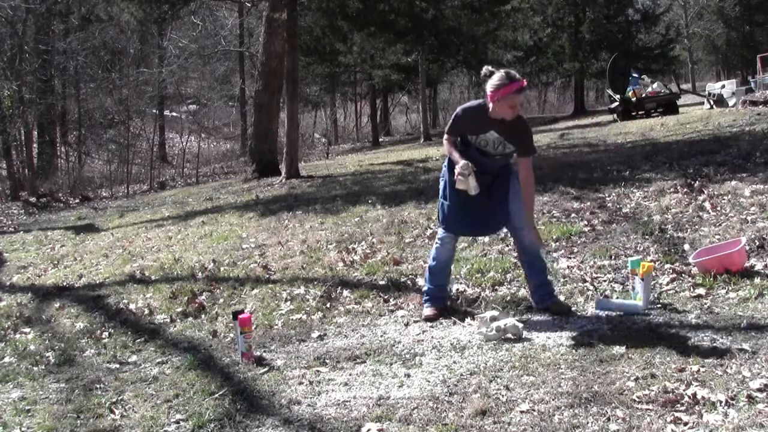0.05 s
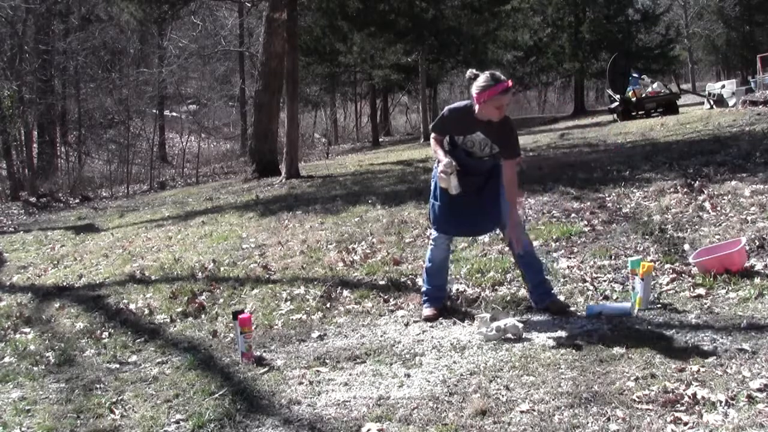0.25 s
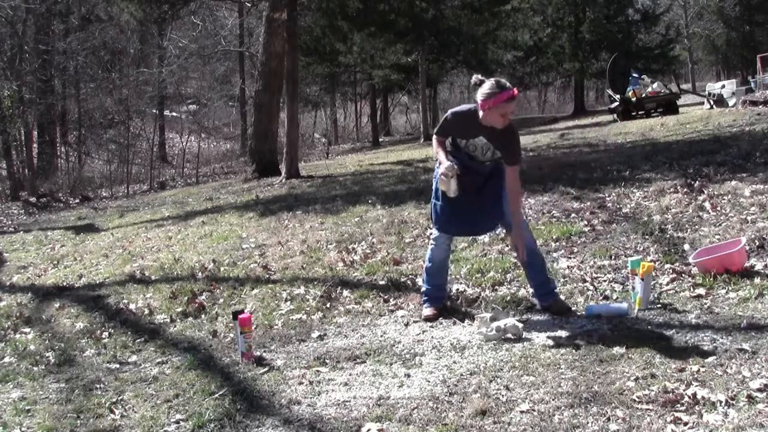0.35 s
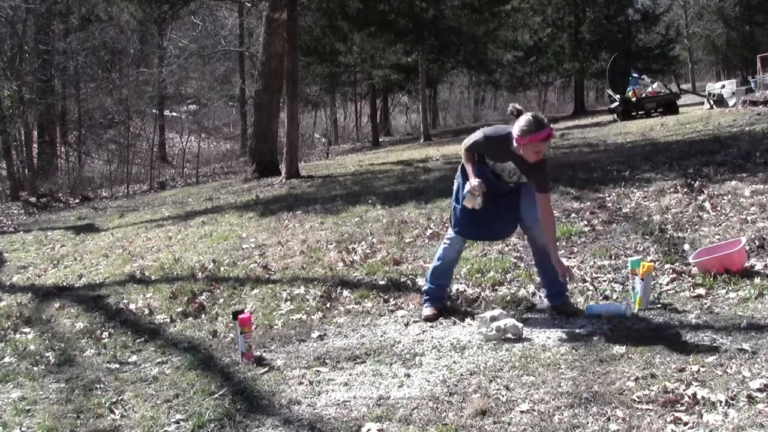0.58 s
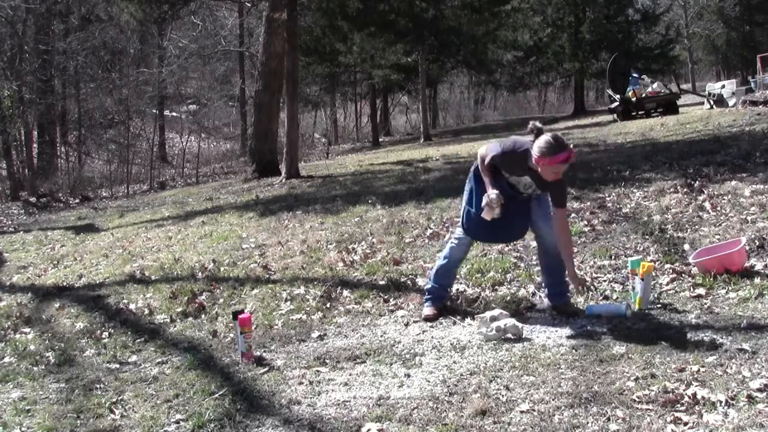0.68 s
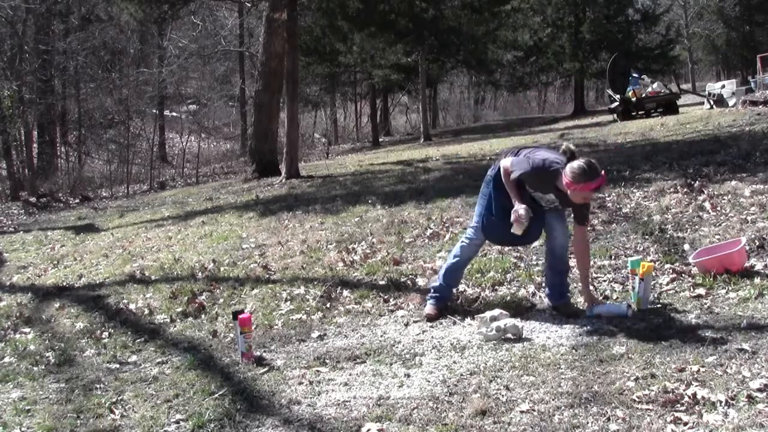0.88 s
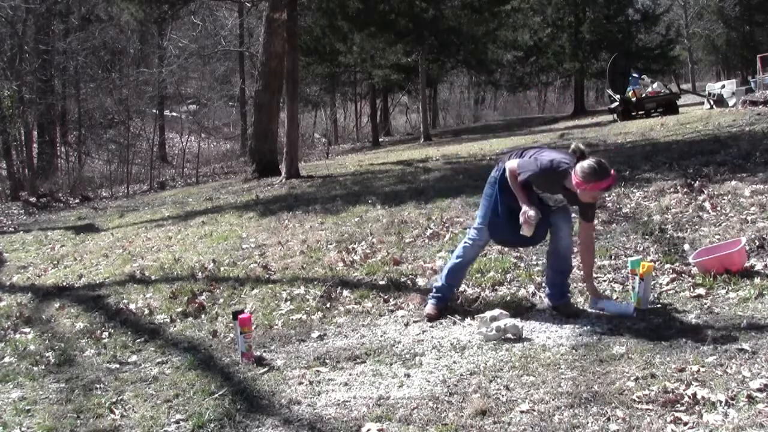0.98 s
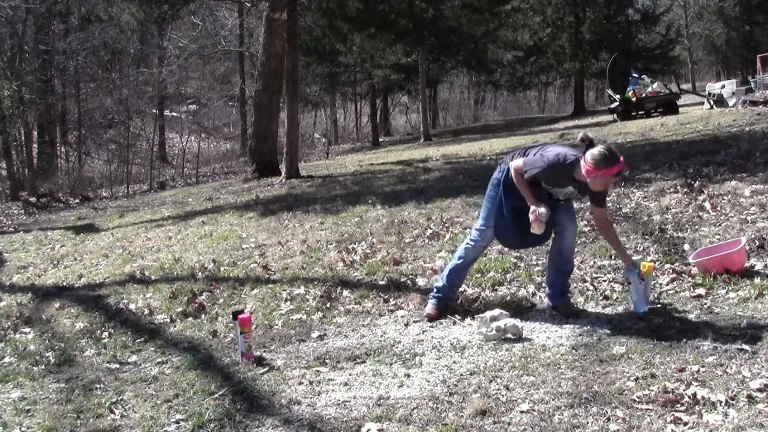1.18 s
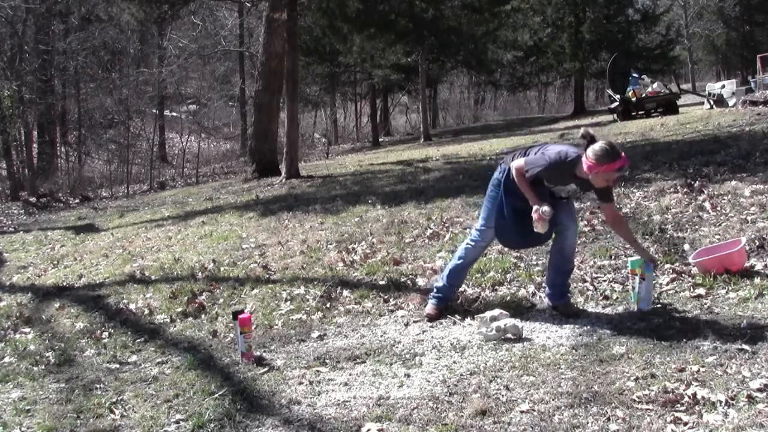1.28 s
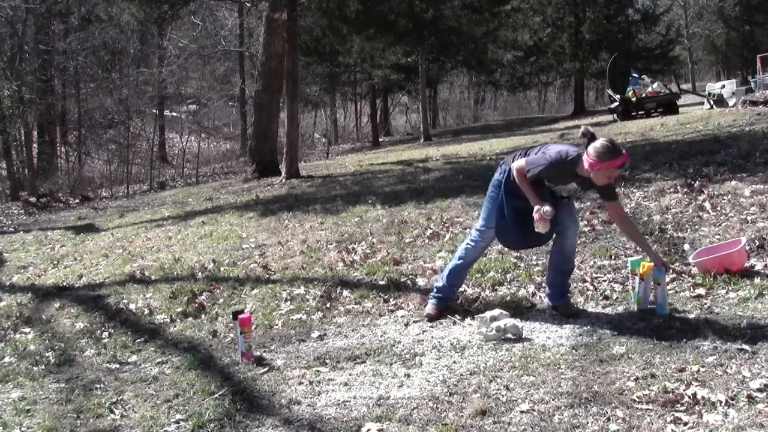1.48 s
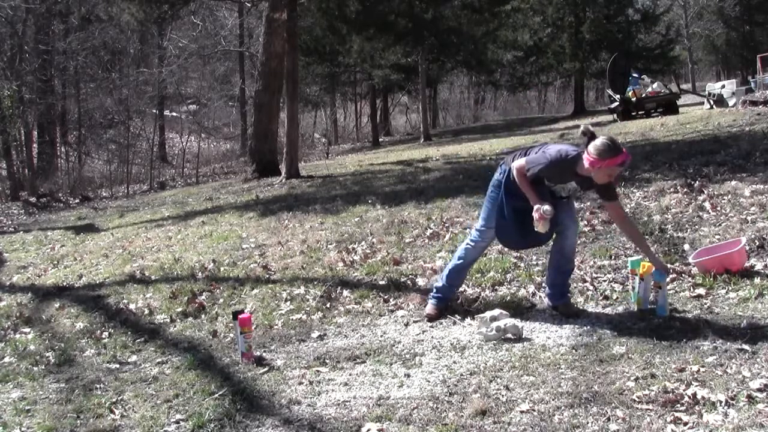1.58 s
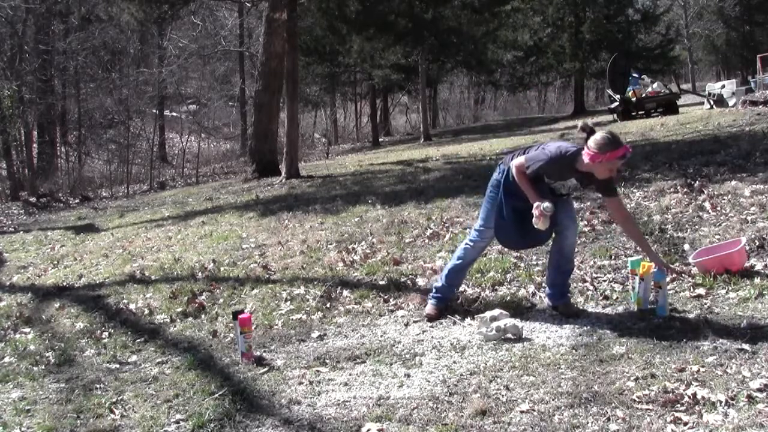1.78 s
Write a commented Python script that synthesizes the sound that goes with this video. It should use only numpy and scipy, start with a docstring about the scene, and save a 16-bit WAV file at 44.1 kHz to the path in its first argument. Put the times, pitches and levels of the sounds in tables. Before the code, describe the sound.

Thin metal cans clatter and bounce on leafy soil, pause, then clink softly as one is lifted and stood beside its neighbours, ending in small dry rattles; faint leaf rustle and low outdoor rumble, nearly dry stereo pickup.

```python
"""A spray paint can topples outdoors against other cans, bounces and rolls on leafy ground.
Its shell rings as decaying modes under noise clashes; soil knocks are low modes, scrapes gritty noise.
It is picked up with light clinks and stood by its neighbours; mixing ball and caps tick as damped modes.
Leaves rustle underfoot as clumped noise over a rumble of coloured noise with a wavering hum."""
import sys
import numpy as np
from scipy import signal
from scipy.fft import rfft, irfft, next_fast_len
from scipy.io import wavfile
from scipy.ndimage import map_coordinates

SR = 44100
rng = np.random.default_rng(int(sys.argv[2]) if len(sys.argv) > 2 else 0)


def put_to_file(sound):
    """Save the sound as 16-bit audio at rate SR, in the file named by the first command-line argument."""
    columns = np.atleast_2d(sound).T  # one column per channel
    safe = np.clip(columns, -1, 1)
    whole_steps = np.round(safe * 32767)
    wavfile.write(sys.argv[1], SR, whole_steps.astype(np.int16))


N = 81585
T = np.arange(SR // 2) / SR  # time within one contact sound [s]


def amp(db):
    """Decibel law: level to amplitude gain."""
    return 10 ** (np.asarray(db) / 20)


def unit(x):
    """Normalisation: scale to an rms of 1."""
    return x / np.sqrt(np.mean(x ** 2) + 1e-20)


def along(points, hz):
    """Spectral envelope: interpolate (frequency [Hz], value) points on a log frequency axis."""
    point_hz, values = np.transpose(points)
    return np.interp(np.log(hz + 1), np.log(point_hz + 1), values)


def over_time(points):
    """Temporal envelope: interpolate (time [s], value) points over the whole scene."""
    return np.interp(np.arange(N) / SR, *np.transpose(points))


def wobble(rate, size):
    """Slow random modulation: a smooth curve through `rate` random knots per second."""
    knots = rng.standard_normal(size // 20)
    return map_coordinates(knots, [np.arange(size) * rate / SR], mode="wrap")


def filtered(x, response):
    """Linear filtering: multiply the spectrum by a response, zero-padded against wrap-around."""
    size = x.shape[-1]
    padded = next_fast_len(size + SR // 4)
    spectrum = rfft(x, padded) * response(np.fft.rfftfreq(padded, 1 / SR))
    return irfft(spectrum, padded)[..., :size]


def noise(spectrum, size, tilt_db=0):
    """Coloured noise of rms 1: white noise shaped by a spectrum, tilted per octave above 500 Hz."""
    def response(hz):
        return amp(along(spectrum, hz) + tilt_db * np.log2(np.maximum(hz, 500)))
    return unit(filtered(rng.standard_normal(size), response))


def fade(t60):
    """Exponential damping: a fall of 60 dB in t60 seconds."""
    return np.exp(-np.log(1000) * T / t60)


def fade_by_band(x, life, scale=1):
    """Frequency-dependent damping: each band decays with its own t60, scale times its life."""
    hz, t, bands = signal.stft(x, SR, nperseg=128)
    t60 = scale * along(life, hz)[:, None]
    return signal.istft(bands * np.exp(-np.log(1000) * t / t60), SR, nperseg=128)[1][:len(x)]


def tone(hz):
    """Simple harmonic motion: a sine of random phase."""
    return np.sin(2 * np.pi * (hz * T + rng.random()))


def add(track, s, sound):
    """Superposition: mix a sound in at time s [s]."""
    part = track[round(s * SR):][:len(sound)]
    part += sound[:len(part)]


# Rustle of leaves underfoot: (time [s], level [dB])
RUSTLE_LEVEL = [(0, -57.5), (0.059, -57), (.11, -65), (.22, -70.5), (.4, -63), (.6, -59), (.75, -73.5),
                (.92, -71), (1.15, -59), (1.33, -74), (1.46, -61.5), (1.62, -69.5), (1.85, -63.5)]
# Spectrum of dry leaves: (frequency [Hz], level [dB])
LEAF_SPECTRUM = [(200, -50), (600, -1.5), (1400, 2.5), (3000, 2), (6000, -9), (9000, -9), (12000, -20.5),
                 (15000, -43)]


def leaves(grain_db=4, clump_db=2.5):
    """Amplitude-modulated noise: fast grains crackle within slower clumps."""
    grain = grain_db * wobble(900, size=N)
    clumps = clump_db * wobble(60.33, size=N)
    crackle = unit(noise(LEAF_SPECTRUM, N) * amp(grain + clumps))
    return amp(over_time(RUSTLE_LEVEL)) * crackle


# Spectrum of the outdoor background: (frequency [Hz], level [dB])
AIR_SPECTRUM = [(15, -60), (25, -2), (318, -5), (558, -8), (1030, -12.5), (1180, -18), (1310, -9.5),
                (1460, -19), (1720, -9.5), (1910, -17), (2500, -16), (3350, -23.5), (4150, -21.5),
                (15000, -34.5)]
# Likeness of left and right in the background: (frequency [Hz], correlation)
AIR_LIKENESS = [(30, 0.13), (100, 0.99), (400, 0.23), (1500, 0.25), (5000, 0.42), (12000, 0.15)]
# Slow change of the background, relative to AIR_DB: (time [s], level [dB])
AIR_CHANGE = [(0, -0.5), (.9, -0.5), (1.35, 1.5), (1.85, 1)]
# Far hum: (time [s], level [dB])
HUM_LEVEL = [(0, -75.5), (.3, -65), (.75, -68.5), (.95, -77), (1.85, -70)]
AIR_DB, HUM_HZ = -59, 150.5


def air():
    """Partial coherence: mid and side noise set the left-right likeness, beside a phase-wavering hum."""
    def angle(hz):
        return np.arccos(np.clip(along(AIR_LIKENESS, hz), -1, 1)) / 2
    mid = filtered(noise(AIR_SPECTRUM, N), lambda hz: np.cos(angle(hz)))
    side = filtered(noise(AIR_SPECTRUM, N), lambda hz: np.sin(angle(hz)))
    background = amp(AIR_DB + over_time(AIR_CHANGE)) * np.array([mid + side, mid - side])
    waver = 0.76 * wobble(5.96, size=N)  # phase [rad]
    hum = unit(np.sin(2 * np.pi * HUM_HZ * np.arange(N) / SR + waver))
    return background + amp(over_time(HUM_LEVEL)) * hum


# Dry ticks of mixing ball and caps: (time [s], level [dB], t60 [s], tilt [dB per octave])
TICK_EVENTS = [(0.176, -56, 0.02, 4), (0.9496, -35, 0.0093, 5), (1.1313, -37, 0.0086, 23),
               (1.4863, -26, 0.0054, 5.5), (1.6427, -32, 0.014, -0.5), (1.6730, -43.5, 0.025, -7),
               (1.683, -44.5, 0.027, -4), (1.702, -34, 0.021, -4), (1.7357, -45, 0.028, -2.5),
               (1.7507, -35.5, 0.015, -0.5), (1.7951, -38, 0.029, 0), (1.8190, -42, 0.02, -1),
               (1.8402, -45.5, 0.028, -1)]
# Modes of a tick, before scatter: (frequency [Hz], relative level [dB])
TICK_PARTIALS = [(2400, -8), (3570, 4), (4700, -3.5), (5720, 2.5), (8750, -3), (9400, -4), (10300, -13),
                 (12700, -21)]
# Noise of a tick: (frequency [Hz], level [dB])
TICK_SPECTRUM = [(80, -11), (300, -7), (1000, 3), (3500, 1.5), (6000, 3.5), (7300, -23), (9300, -1.5),
                 (11500, -15.5), (15000, -36)]
TICK_RING_DB, TICK_NOISE_DB = -4.5, -5


def ticks():
    """Damped impact: small hard contacts on a hand-held can ring briefly with scattered modes."""
    out = np.zeros(N)
    for s, db, t60, tilt_db in TICK_EVENTS:
        ring = 0
        for hz, level_db in TICK_PARTIALS:
            gain = amp(level_db + rng.normal(0, 2.6) + tilt_db * np.log2(hz))
            ring = ring + gain * tone(hz * (1 + 0.0053 * rng.normal()))
        hiss = noise(TICK_SPECTRUM, len(T), tilt_db)
        contact = amp(TICK_RING_DB) * unit(ring) + amp(TICK_NOISE_DB) * hiss
        add(out, s, amp(db) * fade(t60) * contact)
    return out


# Can on soil: (time [s], level [dB], body t60 [s], body pitch [Hz], hard contact over the body [dB])
THUD_EVENTS = [(.1775, -48, 0.028, 550, -3), (0.2346, -36, 0.018, 564, 3), (0.2477, -30.5, 0.019, 616, -3),
               (.2512, -34.5, 0.021, 520, 3), (.2840, -38.5, .03, 470, 5), (0.297, -39, 0.033, 520, -4),
               (.3322, -40.5, 0.054, 450, 6), (0.3554, -37, 0.046, 472, -0.5),
               (.3930, -38, 0.013, 523, 5.5), (0.398, -31, 0.034, 452, 0), (0.42, -43.5, 0.073, 513, -8),
               (.4585, -40.5, 0.029, 490, -21), (.5120, -32.5, 0.022, 462, -2.5),
               (0.577, -37.5, 0.027, 472, -5.5), (0.9561, -37, 0.022, 490, -7.5),
               (1.031, -38, 0.026, 477, -22), (1.492, -42.5, 0.012, 526, 5),
               (1.6830, -41.5, 0.025, 426, -18)]
# Body modes: (multiple of the body pitch, relative level [dB])
BODY_MODES = [(.78, -11), (0.999, 6), (1.22, -8.5), (1.7, -22)]
# Spectrum of the hard contact: (frequency [Hz], level [dB])
SOIL_SPECTRUM = [(40, -37), (200, -17), (480, -2), (850, 3.5), (1500, -5), (3000, -11), (8000, -60)]
THUD_ATTACK_S, CONTACT_T60_S = 0.0012, 0.015  # time constant of the body's rise; contact decay


def thuds():
    """Compliant impact: soft soil excites low hollow body modes along with a short contact noise."""
    out = np.zeros(N)
    for s, db, t60, hz, hard_db in THUD_EVENTS:
        body = unit(sum(amp(level_db) * np.sin(2 * np.pi * hz * ratio * T)
                        for ratio, level_db in BODY_MODES))
        body = body * fade(t60) * (1 - np.exp(-T / THUD_ATTACK_S))
        contact = noise(SOIL_SPECTRUM, len(T)) * fade(CONTACT_T60_S)
        add(out, s, amp(db) * (body + amp(hard_db) * contact))
    return out


SETTLE_S = 0.029  # time constant of the pitch as the can comes free
RING_ROUGH = 0.36  # unevenness of the ring


def mode(hz, db, t60, bend_hz, rise_s):
    """Shell resonance: one mode swells, settles in pitch and dies away unevenly."""
    cycles = hz * T + bend_hz * SETTLE_S * (1 - np.exp(-T / SETTLE_S))
    swell = 1 - np.exp(-T / rise_s)
    roughness = 1 + RING_ROUGH * wobble(159, size=len(T))
    return amp(db) * fade(t60) * swell * roughness * np.sin(2 * np.pi * cycles)


# Shell modes by place struck:
# (frequency [Hz], relative level [dB], t60 [s], pitch offset at the strike [Hz], rise time constant [s])
SHELL_MODES = { "wall": [(1150, -1, 0.025, 0, 0.00066), (1346, -2, 0.38, 27, 0.0012),
               (1414, 1, 0.29, -4.5, 0.0012), (1744, -17, 0.17, -12, 0.0023), (1837, -3, 0.1, 209, 0.00081),
               (2160, -9.5, 0.2, 10, 0.0013), (2736, -18.5, 0.41, -5, 0.00076),
               (2630, -26, 0.23, 120, .001), (2826, -19, 0.21, 7, .001), (3014, -7, 0.087, -11, 0.00064),
               (3520, -11.5, 0.15, -8, 0.0007), (4250, -13, .1, -6, .001), (5730, -12, 0.087, 6, .001),
               (6110, -15.5, 0.085, 6, 0.0012)], "rim": [(1097, -2.5, 0.11, -61, 0.0012),
               (1405, -12.5, 0.22, 6, 0.0034), (1871, -3, 0.14, -120, 0.0012),
               (2044, 4.5, 0.14, -230, 0.00049), (2110, -12, 0.19, 47, .001),
               (2450, -1.5, 0.26, 208.5, 0.024), (2690, -6, 0.13, 1, .002), (3050, -12, 0.047, 4, .001),
               (3466, -14, 0.16, 14, .001), (3900, -8.5, .07, 9, 0.0011), (4800, -10, 0.12, -4, 0.0013),
               (6630, -5.5, 0.042, 6, 0.00072)], "shoulder": [(1110, -10, 0.17, 8, 0.0024),
               (1353, 2, 0.12, -5, 0.00065), (1894, 4, 0.079, 67, 0.00066), (2510, 1.5, 0.17, 43, 0.0016),
               (2725, -18, 0.33, -1, 0.00092), (3260, -25, .14, -6, .001), (4980, -15.5, 0.19, 9, .001),
               (7300, -17, 0.098, -8, .001)], "base": [(1376, -3.5, 0.15, -27, 0.0033),
               (1690, -20, .2, 0, .003), (2190, -7.5, 0.065, 5, .001), (2366, 5, 0.063, 50, 0.00018),
               (2746, 1.5, 0.039, 2, 0.00043), (3660, 1, 0.049, 0, 0.00045), (3610, -16, 0.15, 4, .0005),
               (3840, -1.5, 0.044, -7, 0.00031), (4400, -5, 0.062, -18, 0.00035),
               (4810, -8, 0.078, -15, 0.00044), (8750, -9, 0.033, 5, .0003), (9160, -13, .03, 0, .0003)],
               "seam": [(980, 0, 0.044, 0, 0.00068), (1160, -12, 0.19, 0, .01), (1402, 11, 0.12, -82, .025),
               (1491, -3, 0.13, 6, 0.0027), (2090, -11, 0.2, -97, 0.014), (2470, -2.5, .07, 2, 0.0038),
               (2640, -3, 0.12, 3, 0.007), (3020, 0, 0.11, -230, 0.0098), (3540, 11.5, 0.027, 0, 0.00018),
               (4398, 6, 0.023, 0, 0.00027), (4680, -11, 0.14, 2, .001), (5530, -0.5, 0.067, 0, 0.00059),
               (9400, -15, 0.048, 0, .0003), (9250, -5.5, .035, 0, .0003)],
               "neighbour": [(1215, -7, 0.31, -35, 0.0027), (1405, -9, 0.53, -35, 0.0027),
               (1532, -0.5, 0.22, -54, 0.00074), (1763, 6, 0.034, -6, 0.00074), (2137, -1.5, .05, 0, .0005),
               (2440, -5, 0.058, -2, .0005), (2800, -12.5, 0.13, -80, .002), (4830, -12, 0.085, 6, 0.00083),
               (5100, -3.5, 0.039, 0, .0005)], }
# Metal on metal: (time [s], place struck, ring level [dB], clash level [dB],
# clash t60 before band share [s], clash and crack tilt [dB per octave], crack over the clash [dB])
CLINK_EVENTS = [ (0.2343, "wall", -34, -38.5, 0.055, -0.5, 5),
                (0.2448, "wall", -31.5, -28.5, 0.092, -0.5, -8), (0.251, "wall", -41, -27, 0.019, -6.5, -1),
                (0.2833, "wall", -43.5, -45.5, 0.061, -3, -3), (0.3317, "wall", -47.5, -40.5, 0.02, -2, 2),
                (0.353, "wall", -46.5, -38.5, 0.023, -3.5, 2), (.4350, "rim", -30.5, -33, 0.075, 2.5, -4),
                (.4405, "rim", -48, -34, 0.052, -1.5, -11), (0.5005, "shoulder", -40, -37, 0.044, 2, -4),
                (.5060, "shoulder", -64, -38, 0.042, -4.5, -10),
                (.5500, "shoulder", -42.5, -41.5, 0.062, 3, -3),
                (0.608, "shoulder", -56.5, -51, .06, 10.5, -1), (0.9493, "base", -39, -44.5, 0.068, 2.5, 5),
                (0.9935, "base", -49.5, -49, 0.08, 3.5, 6), (1.0298, "base", -55.5, -49, 0.037, 2, 0),
                (1.0475, "base", -60, -55.5, 0.075, 9, -2), (1.0771, "base", -54.5, -47, .02, 4.5, 11),
                (1.0994, "base", -57, -54, 0.15, -1.5, 2), (1.1311, "base", -46.5, -51, 0.096, 6.5, 12),
                (1.1456, "base", -52.5, -51.5, 0.11, 3.5, 7), (1.4858, "seam", -36.5, -36, .04, 1.5, 6.5),
                (1.4925, "seam", -56, -36, 0.068, -0.5, -1),
                (1.569, "neighbour", -40, -40.5, 0.048, -1.5, 9.5),
                (1.7022, "neighbour", -57, -46, .03, 2.5, 3), ]
# Spectrum of the dense shell modes: (frequency [Hz], level [dB])
CLASH_SPECTRUM = [(50, -33), (200, -15), (500, -7), (850, -3.5), (1400, 3.5), (2500, 1.5), (4000, -2),
                  (6000, -11), (9000, -10), (11500, -24.5), (15000, -30)]
# Band share of the clash decay: (frequency [Hz], share of the t60)
CLASH_SHARE = [(300, 1.7), (1200, 0.61), (3000, 1.56), (6000, 1.18), (12000, 0.44)]
CRACK_T60_S = 0.004  # life of the first contact


def clinks():
    """Modal impact: a crack, a clash of dense shell modes, and the ring of the place struck."""
    out = np.zeros(N)
    for s, place, ring_db, clash_db, t60, tilt_db, crack_db in CLINK_EVENTS:
        # successive modes start with opposite signs
        ring = sum((-1) ** k * mode(*row) for k, row in enumerate(SHELL_MODES[place]))
        clash = fade_by_band(noise(CLASH_SPECTRUM, len(T), tilt_db), CLASH_SHARE, t60)
        crack = amp(crack_db) * fade(CRACK_T60_S) * noise(CLASH_SPECTRUM, len(T), tilt_db)
        add(out, s, amp(ring_db) * ring + amp(clash_db) * (clash + crack))
    return out


# The can scrapes and rolls: (start [s], length before the fall [s], level [dB], tilt [dB per octave])
SCRAPE_EVENTS = [(0.391, 0.037, -42, 1), (1.265, 0.0032, -51.5, -3.5), (1.285, .018, -54.5, 0.5),
                 (1.403, 0.008, -53, -8), (1.448, 0.012, -54, 12.5), (1.691, 0.016, -49.5, 5)]
# Spectrum of a scrape: (frequency [Hz], level [dB])
SCRAPE_SPECTRUM = [(200, -27), (700, 5.5), (1500, 3.5), (2800, 1.5), (5000, -9), (9000, -19), (15000, -34)]
SCRAPE_RISE_S, SCRAPE_FALL_S = 0.0044, 0.015


def scrapes(grain_db=3):
    """Sliding friction: gritty noise swells and falls over each short slide."""
    out = np.zeros(N)
    for s, length, db, tilt_db in SCRAPE_EVENTS:
        corners = [0, SCRAPE_RISE_S, max(length, SCRAPE_RISE_S), length + SCRAPE_FALL_S]
        shape = np.interp(T, corners, [0.43, 0.87, 0.64, 0.026])
        grain = amp(grain_db * wobble(600, size=len(T)))
        grit = unit(noise(SCRAPE_SPECTRUM, len(T), tilt_db) * grain)
        add(out, s, amp(db) * shape * grit)
    return out


LOW_CUT_HZ = 240


def radiate(sound):
    """Radiation efficiency: a small can radiates little bass, as a second-order high-pass."""
    def response(hz):
        s = 1j * hz / LOW_CUT_HZ
        return s ** 2 / (1 + np.sqrt(2) * s + s ** 2)
    return filtered(sound, response)


# Level difference between the ports: (frequency [Hz], left minus right [dB])
PORT_LEAN = [(500, 1.6), (2000, -1.5), (5000, 0.4), (7000, 2), (9500, 4.5), (13000, 5.5)]
# Phase difference between the ports: (frequency [Hz], left lead [rad])
PORT_LEAD = [(9800, 0), (11000, -.55), (13000, -1.6)]


def two_ports(sound):
    """Interaural-style cues: split level and phase differences evenly between two close ports."""
    sides = np.array([[0.5], [-0.5]])
    return filtered(sound, lambda hz: amp(sides * along(PORT_LEAN, hz))
                    * np.exp(1j * sides * along(PORT_LEAD, hz)))


# Decay of the echo from trees: (frequency [Hz], t60 [s])
TREE_DECAY = [(200, 0.68), (1500, 0.23), (4000, 0.32), (12000, 0.6)]
YARD_DB = -27.5  # gain of the unit-energy echo response


def tree_echo(sound):
    """Diffuse reverberation: convolve with a separate decaying noise tail for each side."""
    tails = [fade_by_band(rng.standard_normal(len(T)), TREE_DECAY) for _ in range(2)]
    echo = [signal.fftconvolve(sound, tail / np.linalg.norm(tail))[:N] for tail in tails]
    return amp(YARD_DB) * np.array(echo)


def scene():
    """Superposition: cans and leaves arrive directly and faintly from the trees, over the air."""
    sources = radiate(leaves() + ticks() + thuds() + clinks() + scrapes())
    return two_ports(sources) + tree_echo(sources) + air()


# Treble roll-off of the camera: (frequency [Hz], gain [dB])
TREBLE_ROLL = [(12500, -0.5), (13800, -2), (14500, -19), (15200, -24)]
TOP_HZ = 15200


def record(dry):
    """Band limitation: the camera rolls off the treble and keeps nothing from its band limit up."""
    return filtered(dry, lambda hz: amp(along(TREBLE_ROLL, hz)) * (hz < TOP_HZ))


dry = scene()
out = record(dry)
put_to_file(out)
```